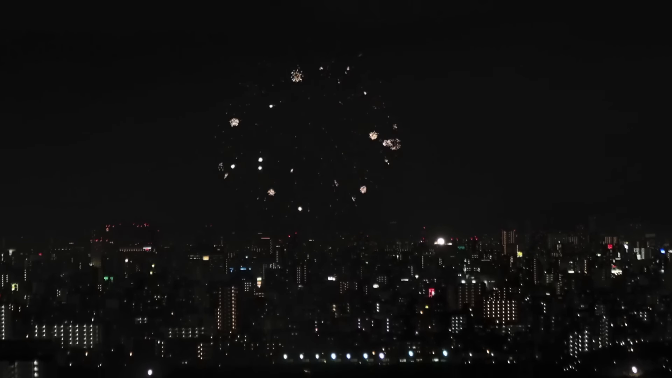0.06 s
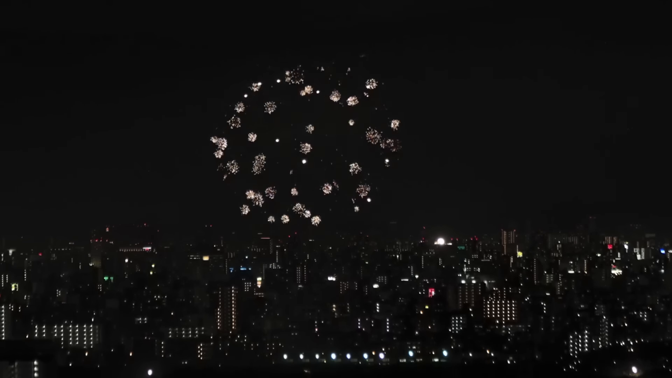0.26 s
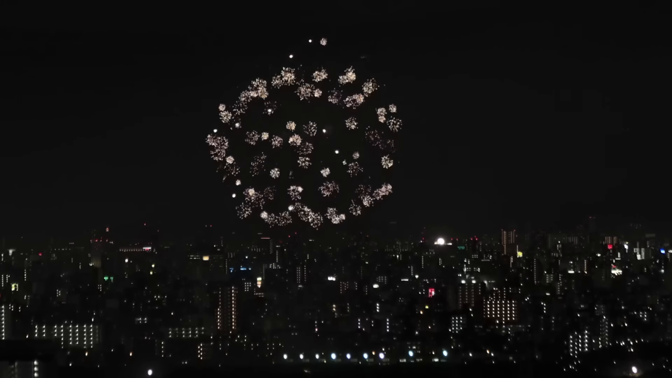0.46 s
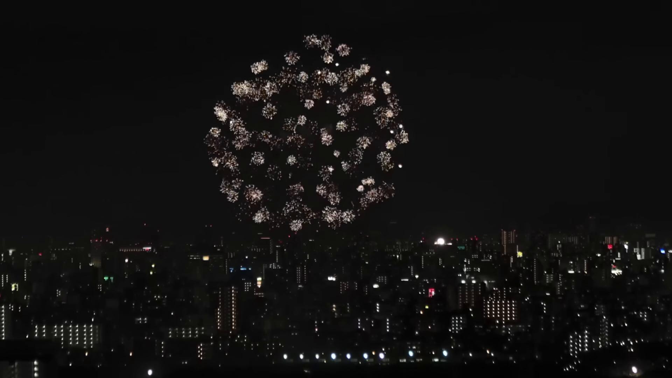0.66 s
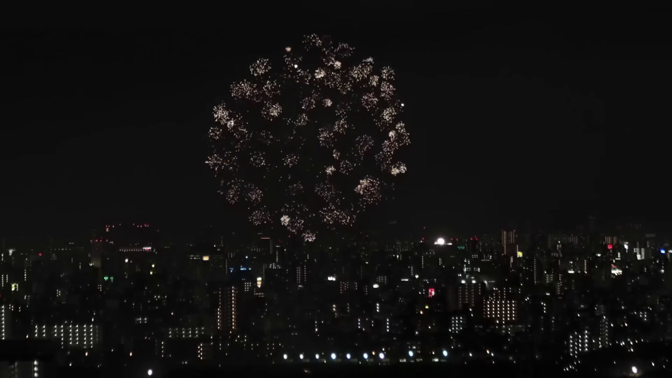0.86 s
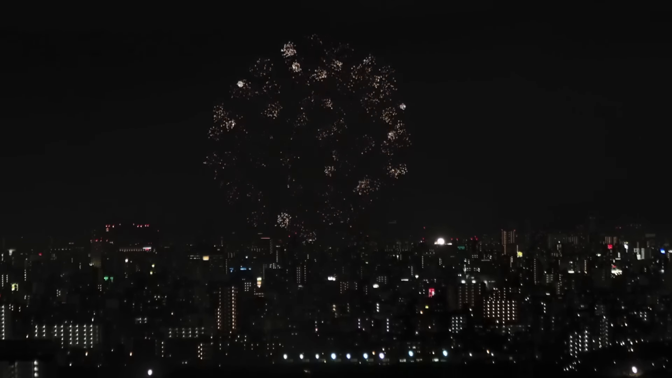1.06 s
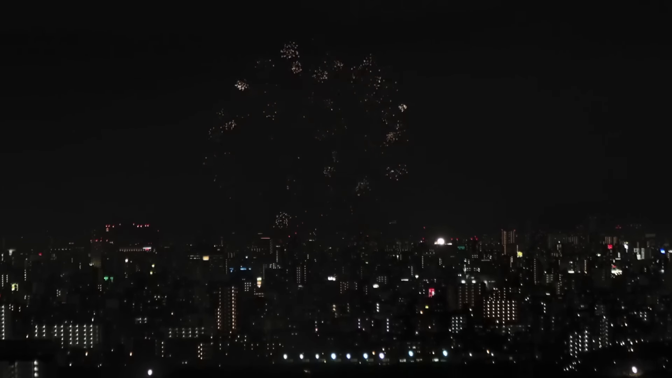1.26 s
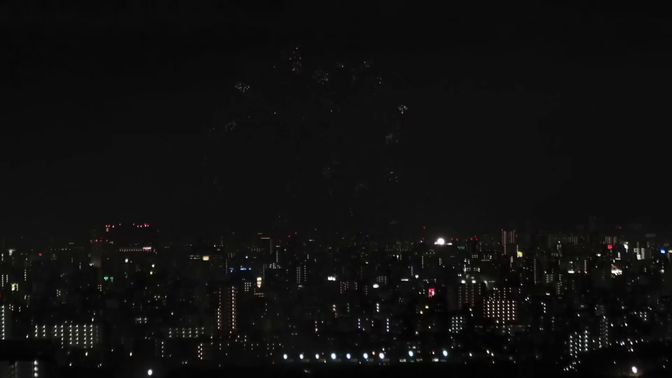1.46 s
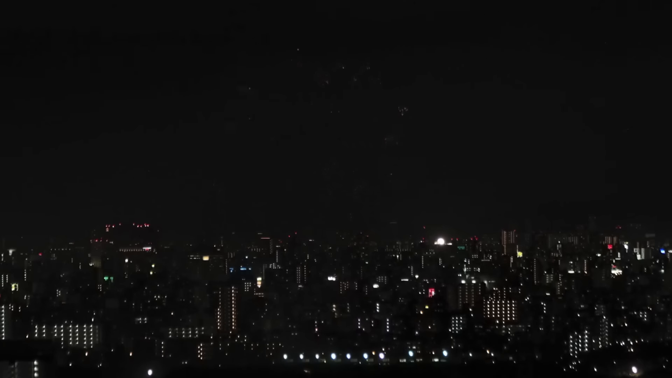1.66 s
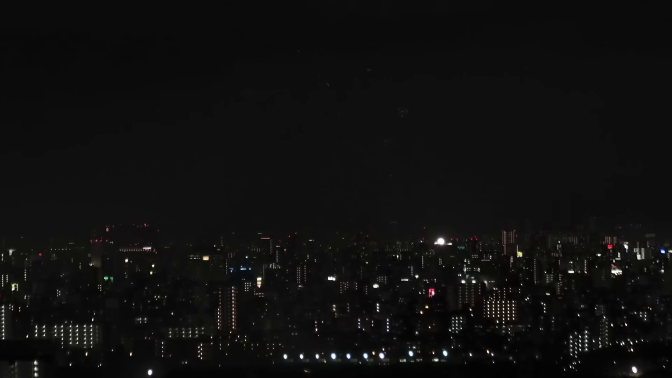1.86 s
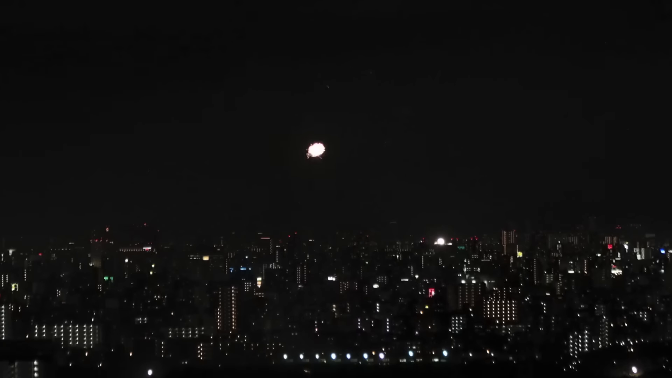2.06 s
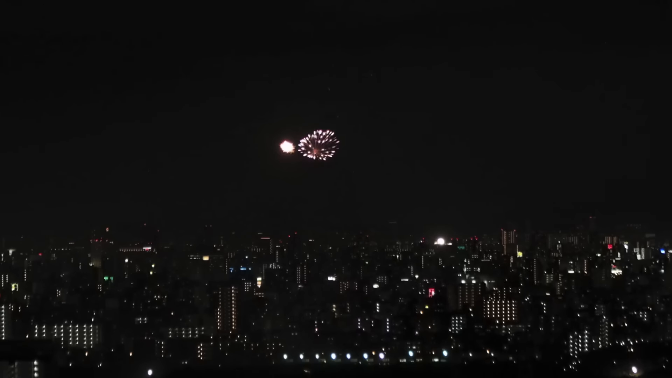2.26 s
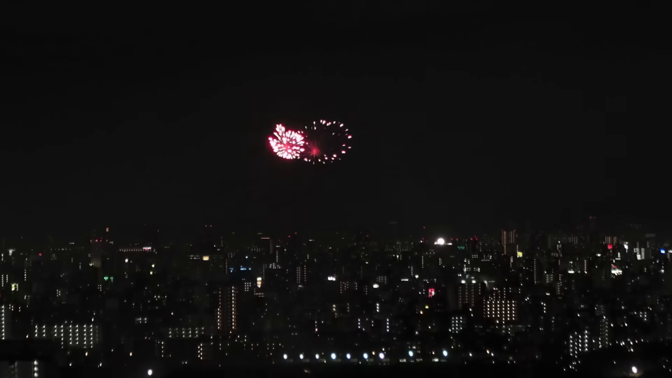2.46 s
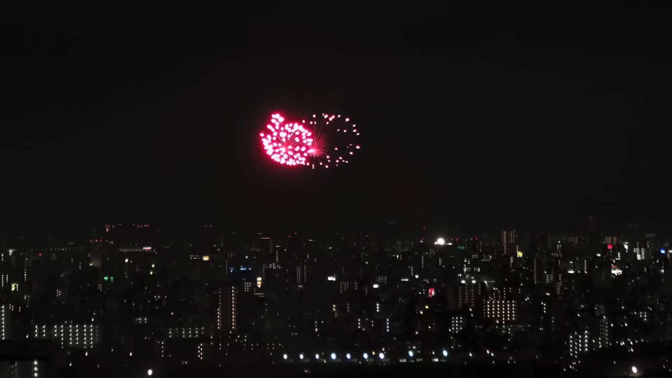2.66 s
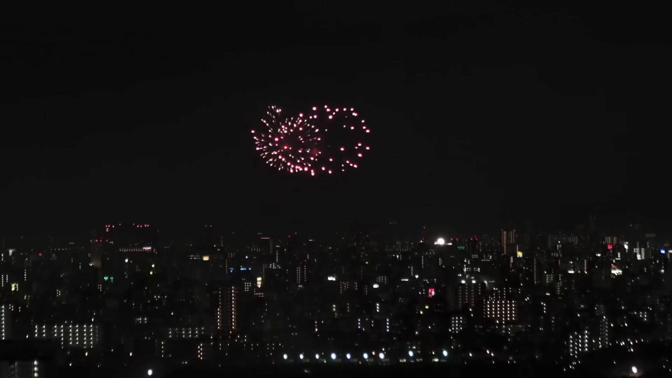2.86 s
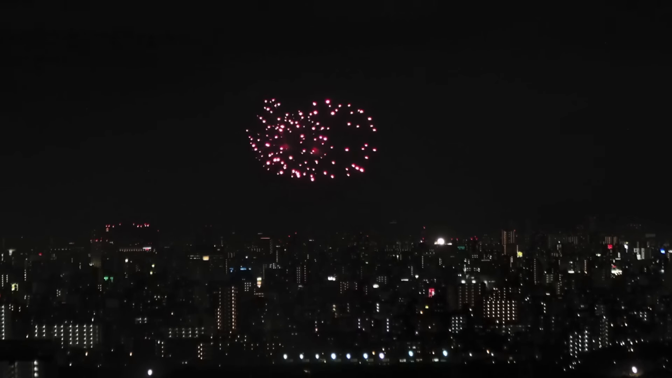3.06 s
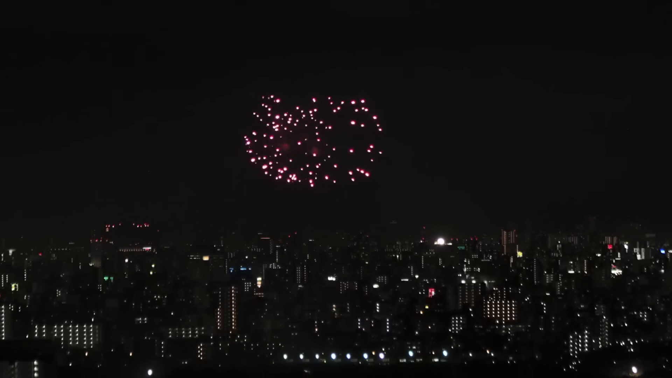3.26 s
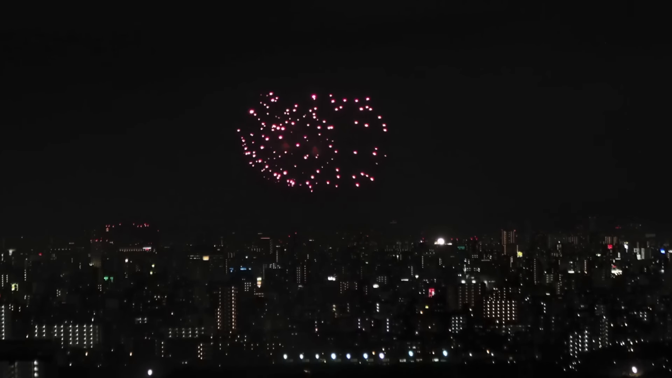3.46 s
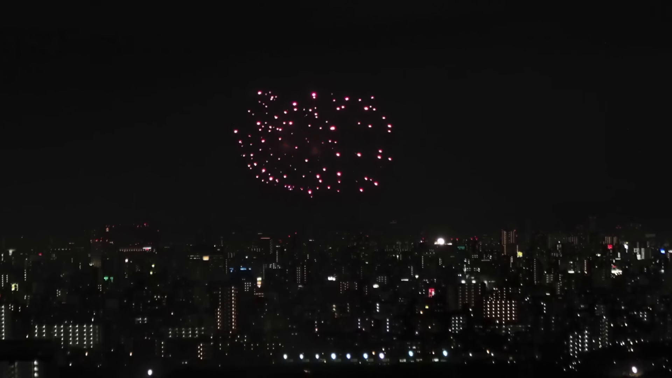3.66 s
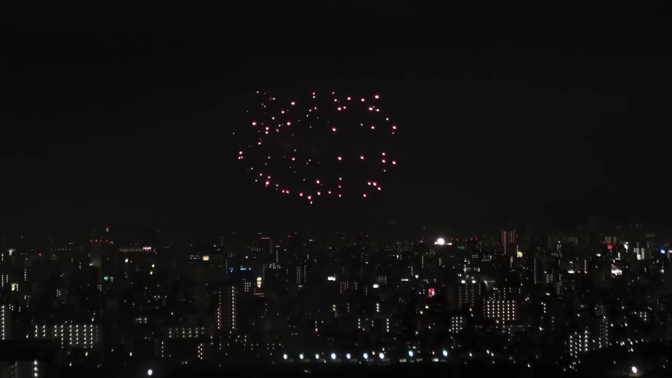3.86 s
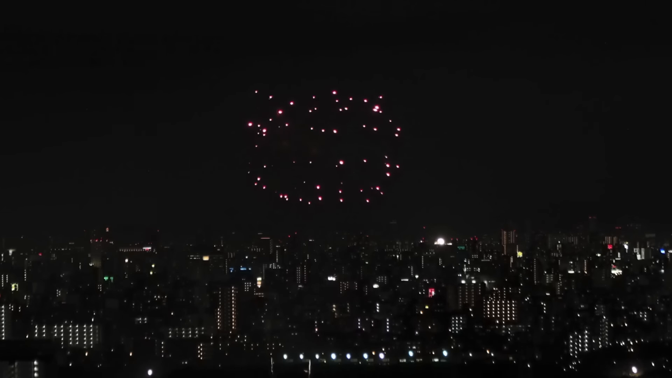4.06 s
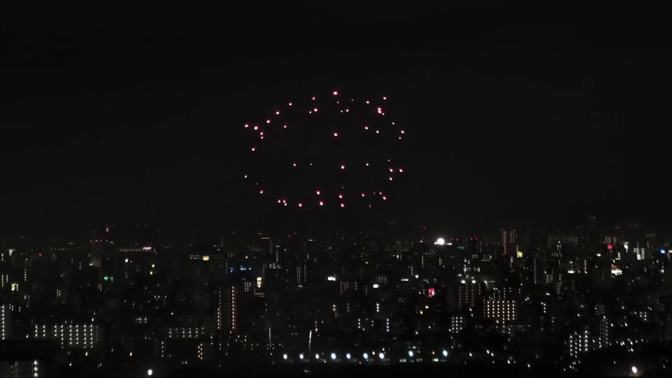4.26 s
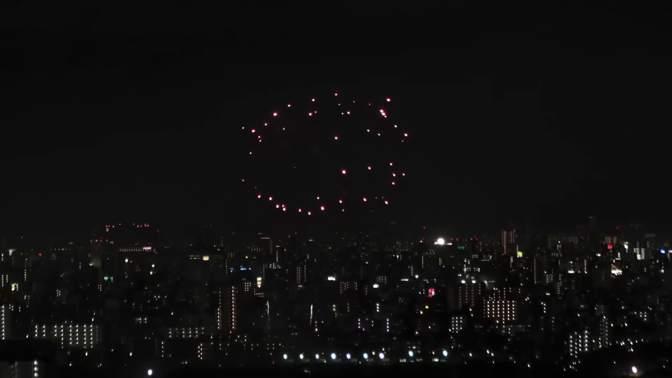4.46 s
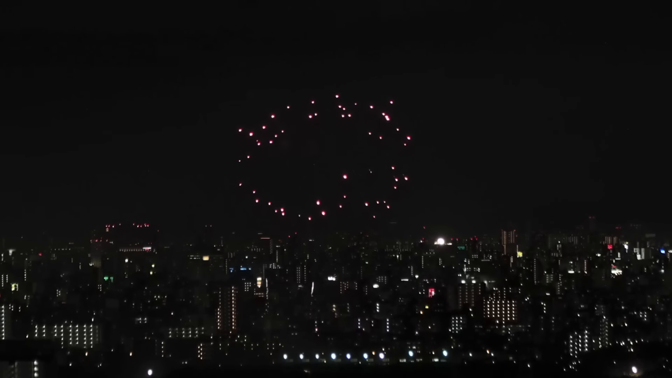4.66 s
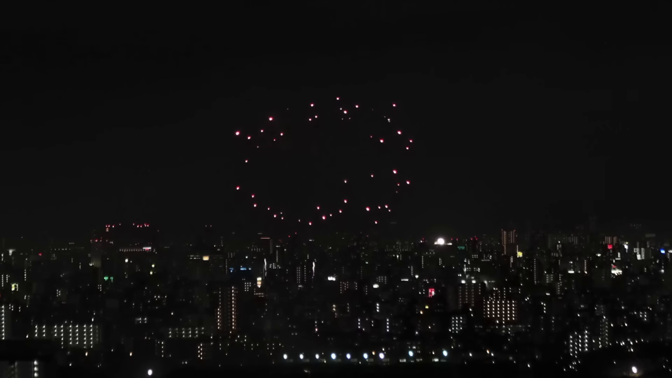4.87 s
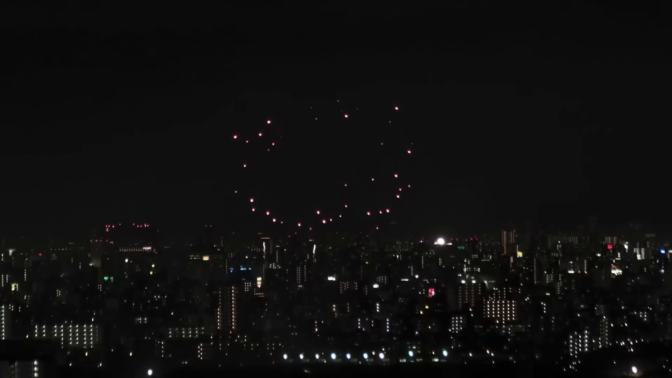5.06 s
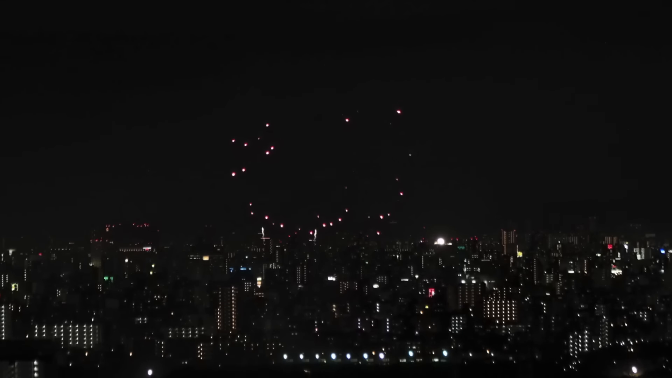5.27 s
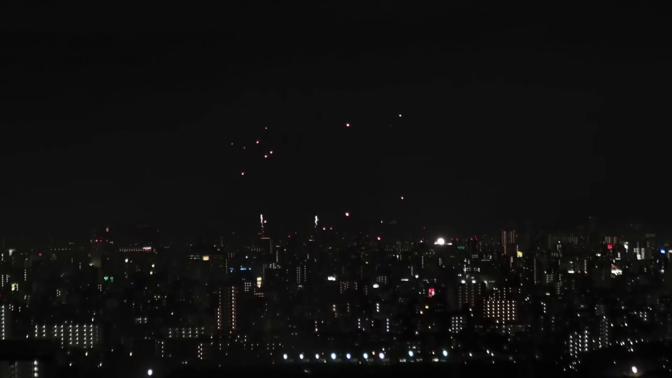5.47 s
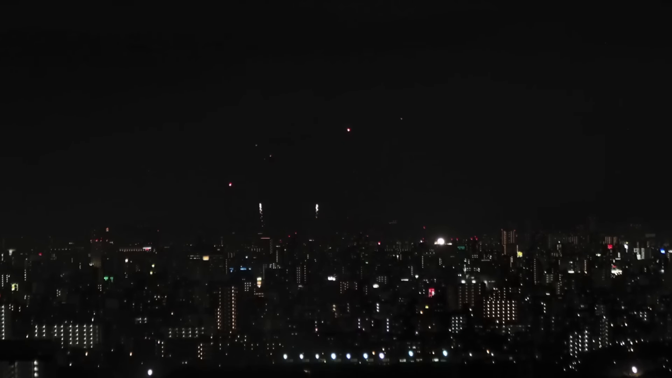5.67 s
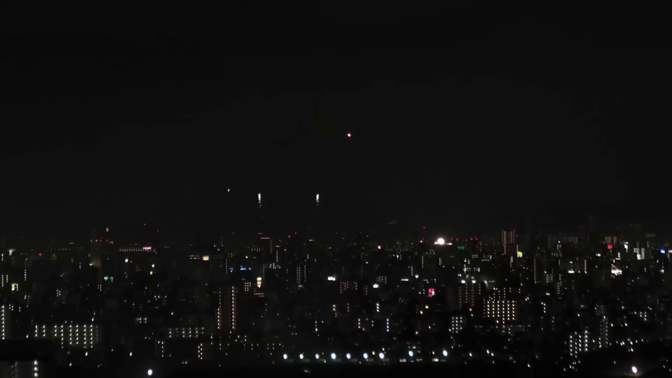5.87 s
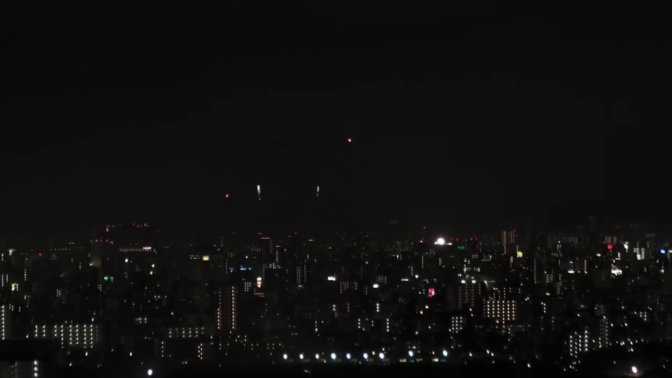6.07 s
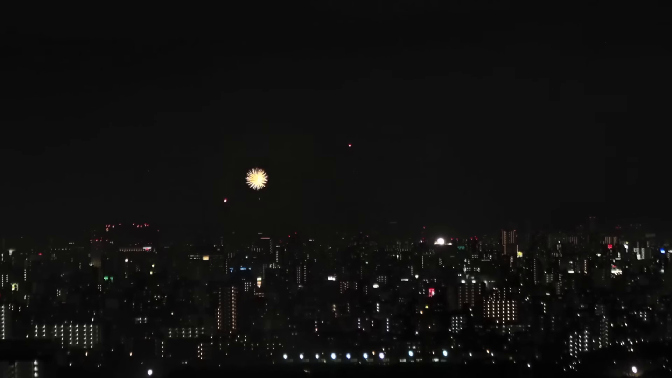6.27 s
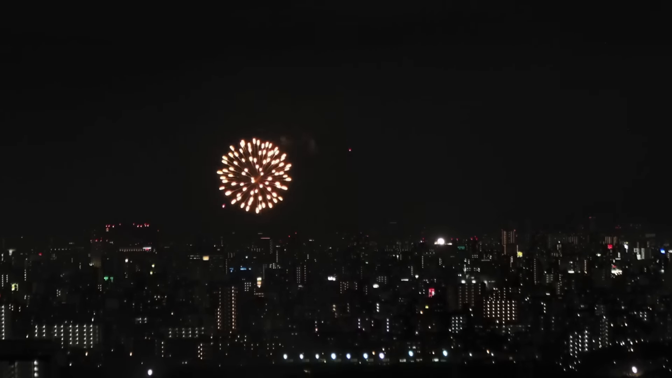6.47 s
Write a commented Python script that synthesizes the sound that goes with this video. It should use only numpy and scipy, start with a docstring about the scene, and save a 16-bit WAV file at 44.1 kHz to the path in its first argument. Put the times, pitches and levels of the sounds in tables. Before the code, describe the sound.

Heard from indoors at night, muffled fireworks boom twice, then twice again after a pause, above a low city drone and faint hiss.

```python
"""Two pairs of firework shells burst far off over a city at night, heard from indoors.
Each blast is a push and a suction, dulled by air and glass; it arrives by several paths,
rings the room and returns from far buildings, twice with a short falling flutter.
Filtered noise makes the rumble of the city in the same room and the microphone hiss;
wavering sines make the ventilation hum, and a steady sine a thin electronic whine."""
import sys
import numpy as np
from scipy import signal
from scipy.fft import rfft, irfft
from scipy.io import wavfile

SR = 44100
rng = np.random.default_rng(int(sys.argv[2]) if len(sys.argv) > 2 else 0)


def master(y):
    """Save y as 16-bit WAV."""
    cut = np.clip(np.atleast_2d(y).T, -1, 1)
    pcm = np.round(cut * 32767)  # scale
    wavfile.write(sys.argv[1], SR, pcm.astype(np.int16))


N = 287091

# the shells: (time [s], level [dB], length of the push [s], first facade bounce: delay [s], level [dB],
# second bounce: delay [s], level [dB]), bounces relative to the straight path
SHELL_BURSTS = [(0.5066, -6.5, 0.00082, 0.0079, 7, 0.016, 11),
                (0.8232, 2.5, 0.0012, 0.00454, -1.5, .0111, 4),
                (4.7206, -0.5, 0.0018, .0078, 8.5, .0246, -11.5),
                (5.0133, -0.1, 0.0017, 0.0076, 8.5, .0189, -5)]
# what air and glass let through: (frequency [Hz], gain [dB])
AIR_AND_GLASS = [(20, -16.5), (50, -10), (80, -4), (115, -7), (185, 4), (225, -4), (330, -5.5), (410, -17),
                 (550, -7), (680, -24), (820, -16), (1100, -19), (1350, -29.5), (2200, -25), (3000, -46),
                 (4500, -63.5)]
# low resonances of the room: (frequency [Hz], decay time T60 [s], gain when a blast strikes [dB],
# relative level as the city drives them [dB])
LOW_MODES = [(59.3, .6, -16, -46), (85.8, 0.31, 11, -41.5), (113, 0.2, 15.5, -35), (173.2, 0.14, 1.5, -45),
             (243.5, 0.75, -0.5, -54.5), (306, 0.33, 5.5, -56.5), (341.7, .29, -5.5, -60),
             (502, 0.28, -4, -61.5), (537, 0.27, -9.5, -65), (593, .26, -17.5, -59)]
# first reflections off the walls: (delay [s], level [dB])
WALL_BOUNCES = [(0.02, -9), (.0374, -9.5), (.0509, -20), (0.0746, -26)]
# colour of the scattered sound in the room: (frequency [Hz], gain [dB])
SCATTER_COLOUR = [(60, -28.5), (150, -10.5), (300, 0.5), (550, 0), (1000, 3), (4000, -3.5)]
# how long that scattered sound lasts: (frequency [Hz], decay time T60 [s])
SCATTER_T60 = [(100, 0.29), (340, 0.39), (600, 0.22), (1200, 0.34), (3000, 0.26)]
# colour of the city wash: (frequency [Hz], relative level [dB])
CITY_COLOUR = [(15, -32), (27, -18), (38, -4.5), (70, -6), (140, -5), (200, -5.5), (260, -11), (450, -15.5),
               (800, -16), (1080, -17), (1280, -25), (2150, -28.5), (3000, -34.5), (7000, -44.5)]
# colour of the microphone hiss: (frequency [Hz], relative level [dB])
HISS_COLOUR = [(100, 5), (3000, 15), (5000, 3), (7000, -27.5), (8500, 2.5), (12500, 4.5), (15700, 2)]
# how alike left and right are before any side gain: (frequency [Hz], likeness [-1 to 1])
STEREO_LIKENESS = [(60, 0.71), (130, 0.85), (300, 0.87), (700, .89), (1400, 0.74), (2400, 0.4),
                   (4400, -0.024), (7000, -0.2)]
# ventilation tones: (mean pitch [Hz], level before swell and waver [dB], rms pitch wander [Hz],
# share of the swell followed [0 to 1])
FAN_TONES = [(79.8, -36, 1.35, .05), (179.2, -40.5, 3.535, 0.8), (362.3, -58.5, 2, 0.3)]
# broad colouring of window and room higher up: (centre [Hz], width [Hz], gain [dB])
UPPER_RESONANCES = [(675, 20, 0.5), (779, 19, 3.5), (906, 25, -4.5), (1030, 66, 2.5), (1335, 31, -1),
                    (1424, 22, 3), (1605, 110, 3.5), (1880, 40, 1), (2155, 130, 3)]
# flutter off rows of buildings: (time [s], level [dB], length [s], first pitch [Hz], last pitch [Hz])
FACADE_FLUTTERS = [(0.856, -28, 0.097, 371, 296), (4.783, -30, .04, 321, 307)]

WHINE_HZ, WHINE_DB = 6988, -92
EDGE_HZ = 15800  # upper edge of the band
ECHO_S = .247  # delay of the far towers
# a shell's size is the length of its push, in doublings from that of a middling shell
MIDDLING_BLAST_S = .0014
# larger shells knock less in the low mids and stir more scattered sound in the room
BODY_DB, BODY_DB_PER_DOUBLING = 0.7, -7
SCATTER_DB, SCATTER_DB_PER_DOUBLING = -.3, 5
# they also come back louder and deeper from the far towers
ECHO_DB, ECHO_DB_PER_DOUBLING = -16, 8
ECHO_HZ, ECHO_OCTAVES_PER_DOUBLING = 230, -2.3
# the hum makes one slow swell: it grows to a crest, then eases off
HUM_CREST_S, HUM_RISE_DB_PER_S, HUM_FADE_DB_PER_S = 3.3, 3, 2


def amp(db):
    """Decibels to gain."""
    return 10 ** (np.asarray(db) / 20)


def unit(x):
    """Scales to rms 1."""
    return x / np.sqrt(np.mean(x ** 2) + 1e-20)


def read(points, hz):
    """Reads a table on a log-frequency axis."""
    f, value = np.transpose(points)
    return np.interp(np.log(hz + 1), np.log(f + 1), value)


def bins(size):
    """Frequencies of the spectrum of a sound that many samples long."""
    return np.fft.rfftfreq(size, 1 / SR)


def noise(gain):
    """Noise of rms 1, coloured by the given gain at each frequency."""
    white = rng.standard_normal(N)
    return unit(irfft(rfft(white) * gain, N))


def drift(rate_hz):
    """Random wander of rms 1, with little movement faster than the rate."""
    return noise(np.exp(-(bins(N) / rate_hz) ** 2))


def delayed(x, s):
    """The same sound, s seconds later, cut to the same length."""
    shift = max(round(s * SR), 0)
    silence = np.zeros(x.shape[:-1] + (shift,))
    return np.concatenate([silence, x], axis=-1)[..., :x.shape[-1]]


def causal(points, size=8192):
    """Impulse response with the given spectrum and no sound before its start (minimum phase)."""
    hz = abs(np.fft.fftfreq(size, 1 / SR))
    log_gain = np.log(amp(read(points, hz)))
    spectrum = np.exp(np.conj(signal.hilbert(log_gain)))
    return np.fft.ifft(spectrum).real[:size // 2]


def two_ports(a, b, apart_db=0):
    """Mixes two unrelated sounds into a pair that is alike in the bass and apart in the treble."""
    size = len(a)
    same = np.clip(read(STEREO_LIKENESS, bins(size)), -1, 1)
    mid = irfft(rfft(a) * np.sqrt((1 + same) / 2), size)
    side = amp(apart_db) * irfft(rfft(b) * np.sqrt((1 - same) / 2), size)
    return np.array([mid + side, mid - side])


def panes(hz):
    """Gain of the upper resonances and the gaps between them."""
    gain_db = sum(db * np.exp(-((hz - centre) / width) ** 2) for centre, width, db in UPPER_RESONANCES)
    return amp(gain_db)


def scatter(rise_s=0.0027):
    """One second of dense reflections, each band dying at its own speed."""
    hz, t, bands = signal.stft(rng.standard_normal((2, SR)), SR, nperseg=256)
    decay = amp(-60 * t / read(SCATTER_T60, hz)[:, None])
    tail = signal.istft(bands * decay, SR, nperseg=256)[1][:, :SR]
    tail = irfft(rfft(tail) * panes(bins(SR)), SR)
    tail = tail * (1 - np.exp(-np.arange(SR) / SR / rise_s))  # soft build-up
    tail = tail / np.linalg.norm(tail[0])
    tail = signal.fftconvolve(tail, causal(SCATTER_COLOUR)[None], axes=1)[:, :SR]
    return two_ports(*tail, apart_db=-6)


def room():
    """The direct path, the first wall reflections and the ringing of the low modes."""
    t = np.arange(SR) / SR
    direct = 1. * (t == 0)
    response = direct + sum(amp(db) * delayed(direct, s) for s, db in WALL_BOUNCES)
    for hz, t60, db, _ in LOW_MODES:
        damping = np.log(1000) / t60
        ring = np.exp(-damping * t) * np.cos(2 * np.pi * hz * t)
        response = response + amp(db) * 2 * damping / SR * ring  # at equal gain, long rings start softer
    return response


def microphone(hiss_db=-60.0):
    """Each channel's own hiss and a thin electronic whine."""
    colour = amp(read(HISS_COLOUR, bins(N)))
    hiss = np.array([noise(colour), noise(colour)])
    whine = np.sqrt(2) * np.sin(2 * np.pi * WHINE_HZ * np.arange(N) / SR)
    return amp(hiss_db) * hiss + amp(WHINE_DB) * whine


def ventilation(waver_db=2, waver_hz=6):
    """A few fan tones that waver in pitch and level and share one slow swell."""
    past_crest_s, out = np.arange(N) / SR - HUM_CREST_S, 0
    swell_db = np.minimum(HUM_RISE_DB_PER_S * past_crest_s, -HUM_FADE_DB_PER_S * past_crest_s)
    for hz, db, wander, share in FAN_TONES:
        turns = rng.random() + np.cumsum(hz + wander * drift(waver_hz)) / SR
        level_db = db + share * swell_db + waver_db * drift(waver_hz)
        out = out + np.sqrt(2) * amp(level_db) * np.sin(2 * np.pi * turns)
    return out


def city(wash_db=-39.0, modes_db=-0.36, width_hz=16, swell_db=0.76, swell_hz=1.5):
    """Distant traffic: a dull wash, and a rumble that swells a little at random as it drives the room modes."""
    hz = bins(N)
    colour = amp(read(CITY_COLOUR, hz)) * panes(hz)
    wash = two_ports(noise(colour), noise(colour))
    rumble = 0
    for mode_hz, _, _, db in LOW_MODES:
        width = width_hz * np.sqrt(mode_hz / LOW_MODES[2][0])  # the lowest modes are the narrowest
        resonance = 1 / (1 + ((hz - mode_hz) / width) ** 2) ** 2
        rumble = rumble + amp(db) * noise(resonance)
    return amp(wash_db) * wash + amp(modes_db + swell_db * drift(swell_hz)) * rumble


def flutter(room_db=-14):
    """Returns from one facade after another run together into a low tone that falls as their gaps widen."""
    out = np.zeros(N)
    for s, db, length, first_hz, last_hz in FACADE_FLUTTERS:
        size, start = round(length * SR), round(s * SR)
        turns = np.cumsum(np.linspace(first_hz, last_hz, size)) / SR
        fade = signal.windows.tukey(size, .5)
        out[start:start + size] += amp(db) * fade * np.sin(2 * np.pi * turns)
    in_room = signal.fftconvolve(out[None], scatter(), axes=1)[:, :N]
    return out + amp(room_db) * in_room


def fireworks(level_db=0, echo_spread_db=4, echo_edge_db=-15, body_hz=335, body_ratio=1.5):
    """A sharp push and a longer suction; facade bounces can outweigh the shadowed straight path."""
    t, out = np.arange(SR) / SR, np.zeros((2, N + SR))
    glass, indoors = causal(AIR_AND_GLASS), room()
    for s, db, length, first_s, first_db, second_s, second_db in SHELL_BURSTS:
        doublings = np.log2(length / MIDDLING_BLAST_S)
        blast = np.diff(SR * t * np.exp(-t / length), prepend=0)  # push and suction cancel out
        # the straight path, then two separate facade bounces
        first_bounce = amp(first_db) * delayed(blast, first_s)
        second_bounce = amp(second_db) * delayed(blast, second_s)
        blast = blast + first_bounce + second_bounce
        body_db = BODY_DB + BODY_DB_PER_DOUBLING * doublings  # small shells knock, large ones thud
        body = causal([(body_hz / body_ratio, 0), (body_hz, body_db), (body_hz * body_ratio, 0)])
        blast = signal.fftconvolve(blast, signal.fftconvolve(glass, body))[:SR]

        near = indoors + amp(SCATTER_DB + SCATTER_DB_PER_DOUBLING * doublings) * scatter()
        # far towers return one broad band
        echo_hz = ECHO_HZ * 2 ** (ECHO_OCTAVES_PER_DOUBLING * doublings)
        towers = causal([(echo_hz / 4, echo_edge_db), (echo_hz, 0), (echo_hz * 4, echo_edge_db)])
        far = indoors + amp(echo_spread_db) * scatter()
        far = signal.fftconvolve(far, towers[None], axes=1)[:, :SR]
        echo_db = ECHO_DB + ECHO_DB_PER_DOUBLING * doublings
        paths = near + amp(echo_db) * delayed(far, ECHO_S)

        start = round(s * SR)
        heard = signal.fftconvolve(blast[None], paths, axes=1)[:, :SR]
        out[:, start:start + SR] += amp(level_db + db) * heard
    return out[:, :N]


def scene(left_db=0.19):
    """Everything together, all but the microphone a touch louder on the left."""
    balance = amp([[left_db], [-left_db]])
    return (fireworks() + flutter() + city() + ventilation()) * balance + microphone()


def record(dry):
    """The highest peaks are rounded off at full scale; then the band limit."""
    held = dry / (1 + dry ** 8) ** (1 / 8)
    low_pass = signal.firwin(511, EDGE_HZ, window=("kaiser", 9), fs=SR)
    return signal.oaconvolve(held, low_pass[None], "same", axes=1)


dry = scene()
out = record(dry)
master(out)
```